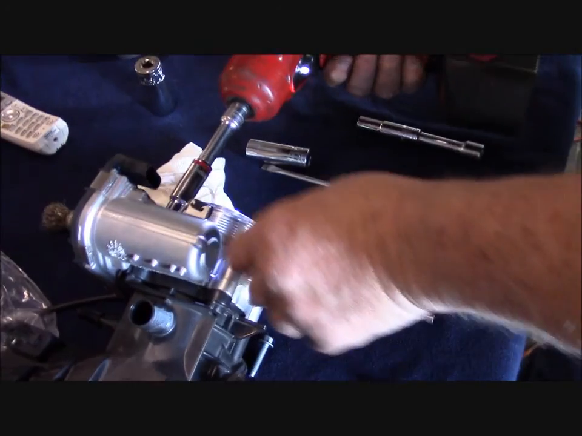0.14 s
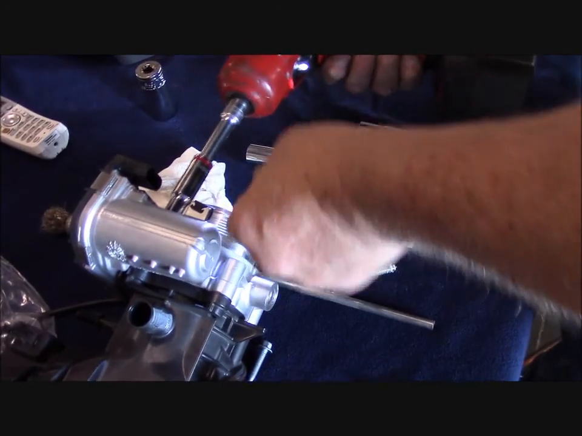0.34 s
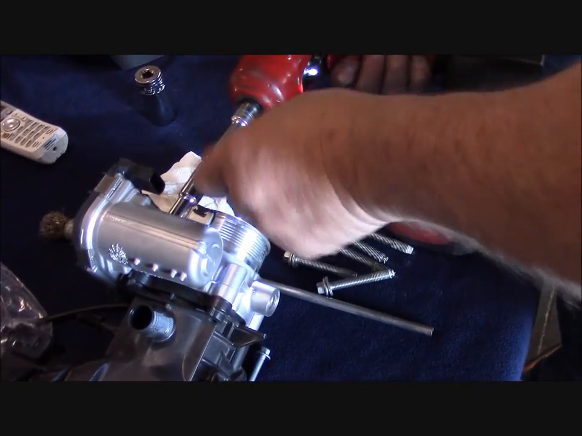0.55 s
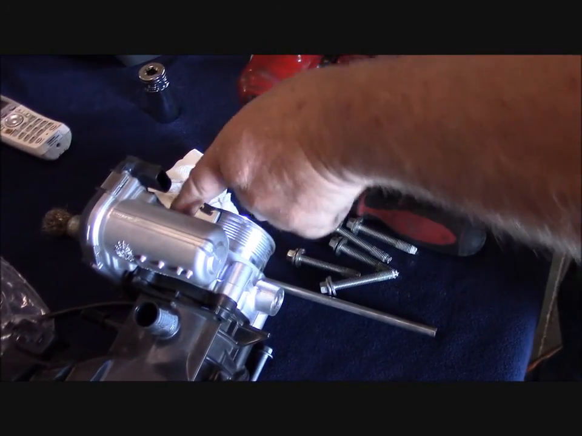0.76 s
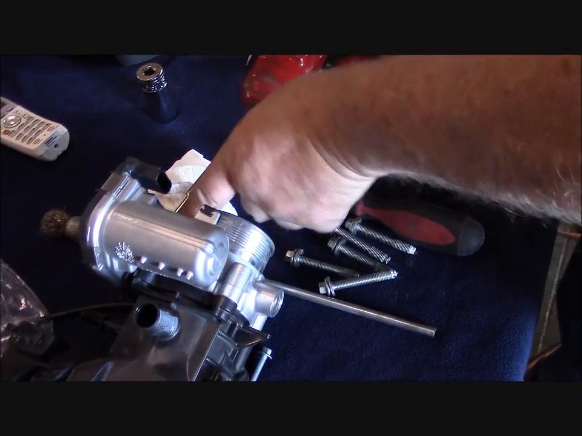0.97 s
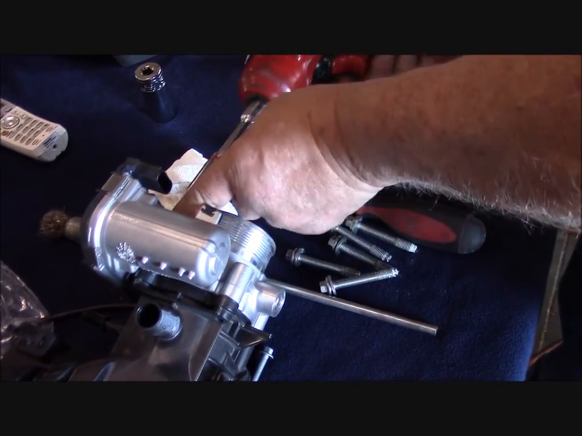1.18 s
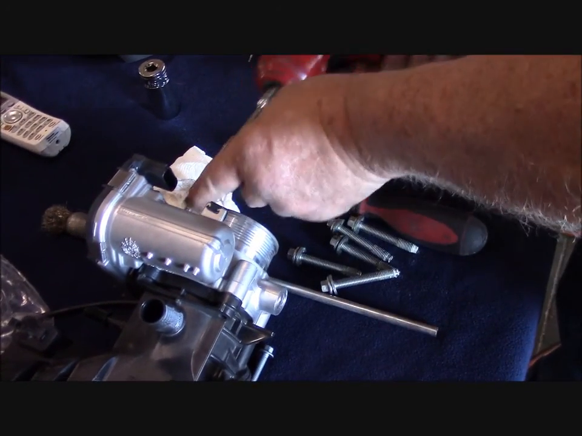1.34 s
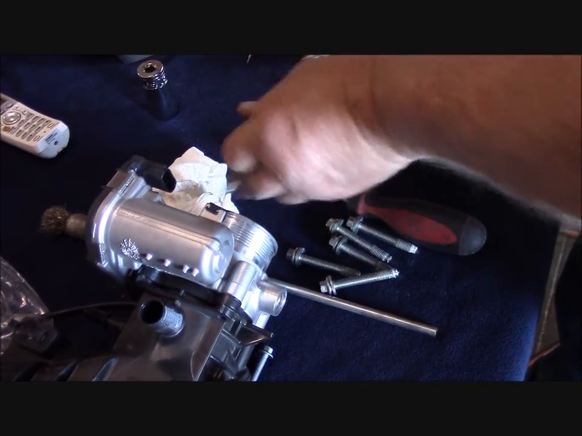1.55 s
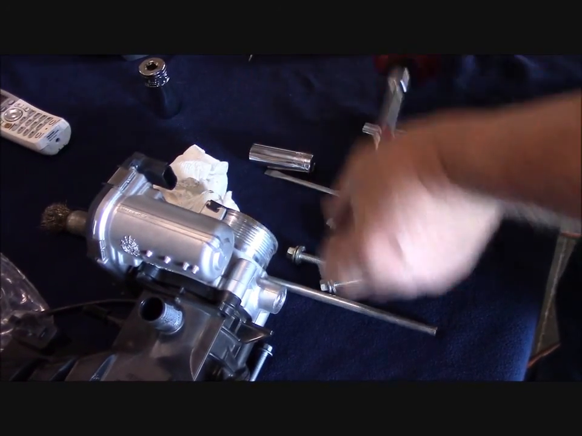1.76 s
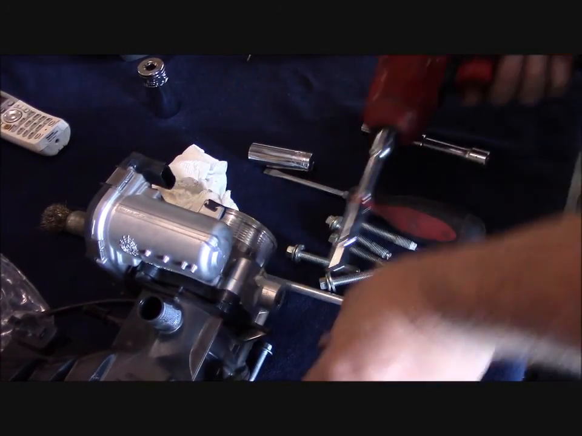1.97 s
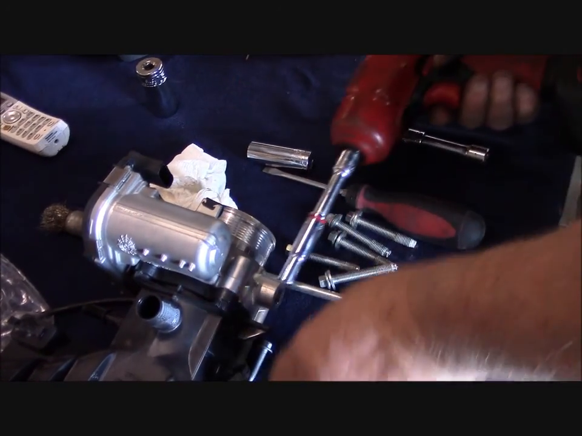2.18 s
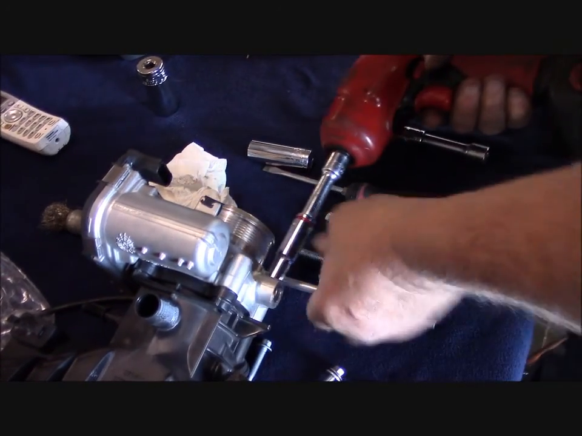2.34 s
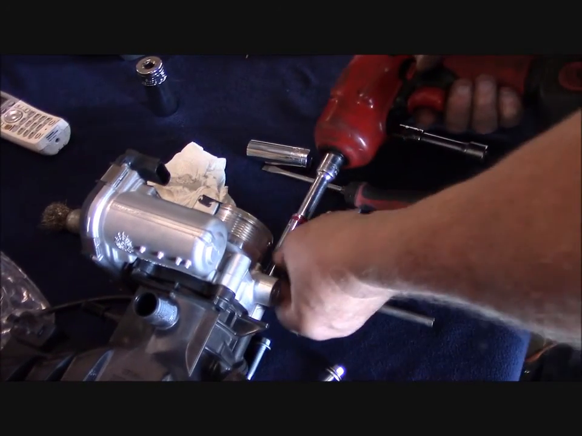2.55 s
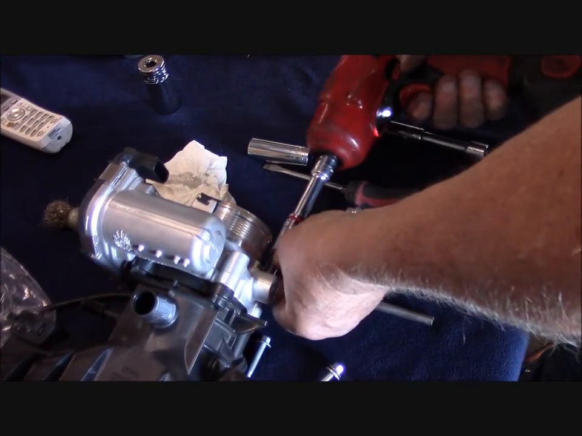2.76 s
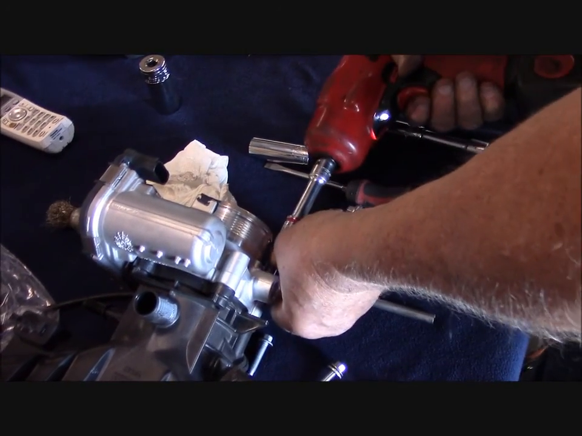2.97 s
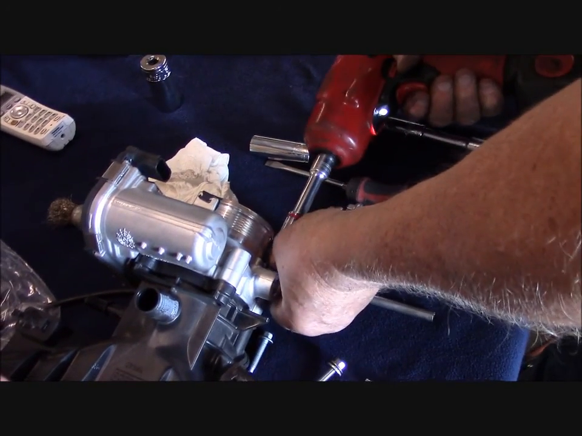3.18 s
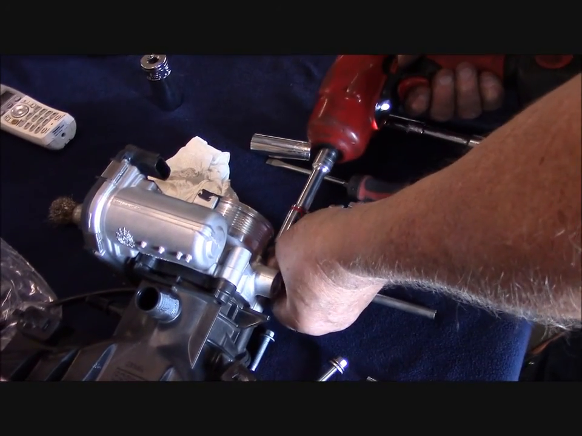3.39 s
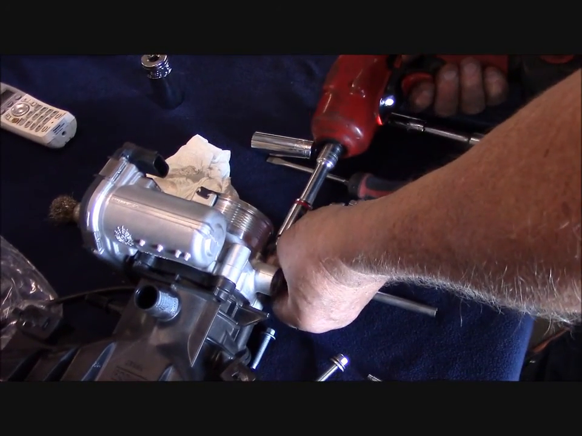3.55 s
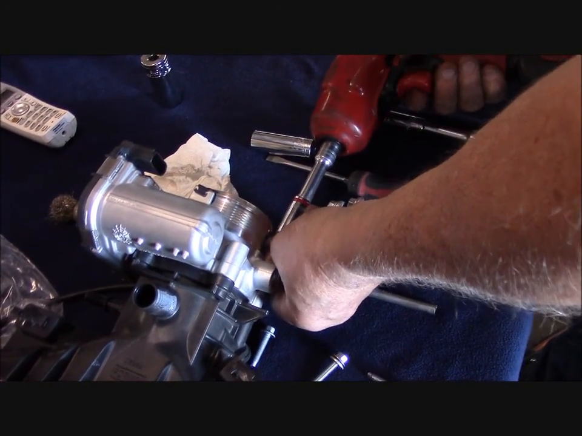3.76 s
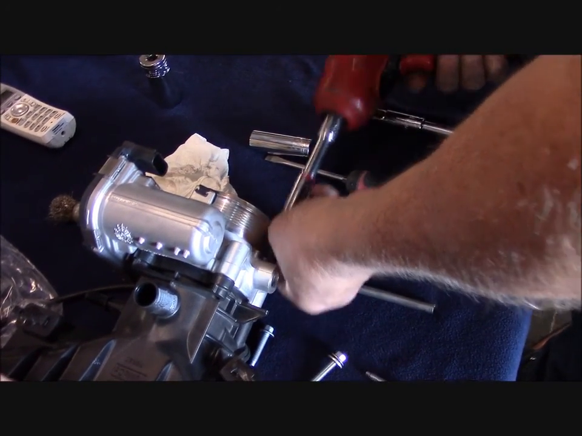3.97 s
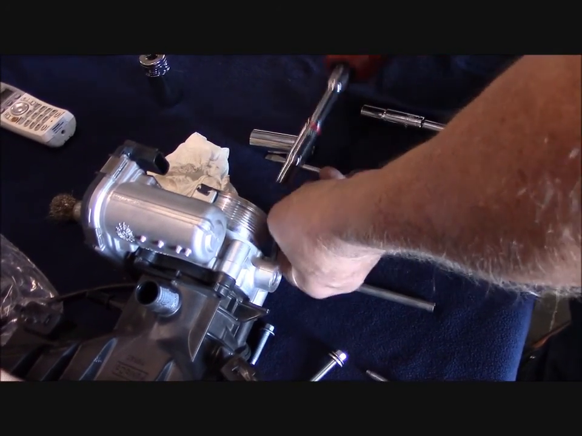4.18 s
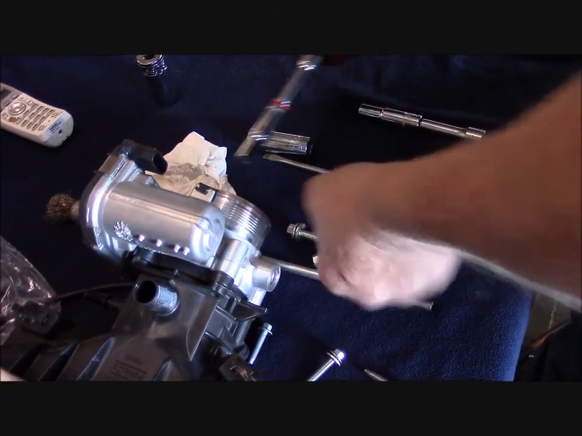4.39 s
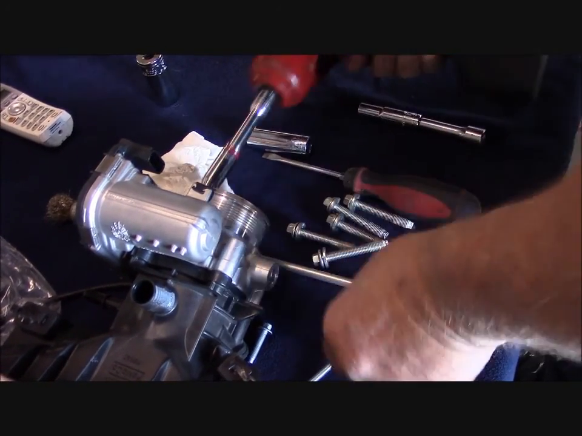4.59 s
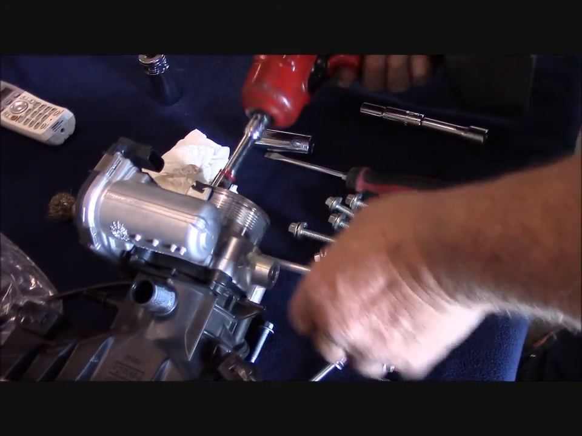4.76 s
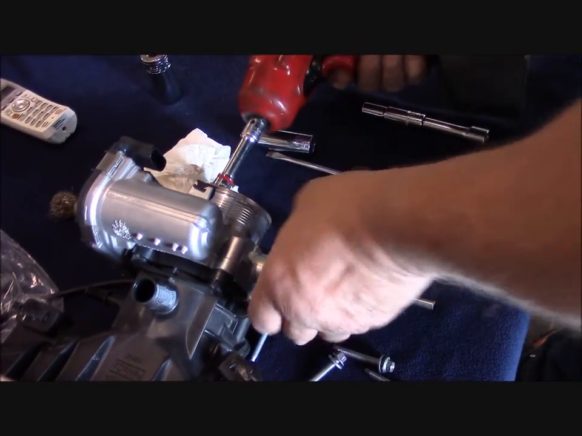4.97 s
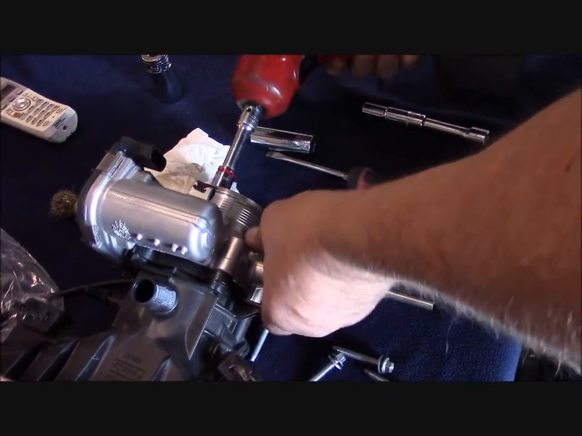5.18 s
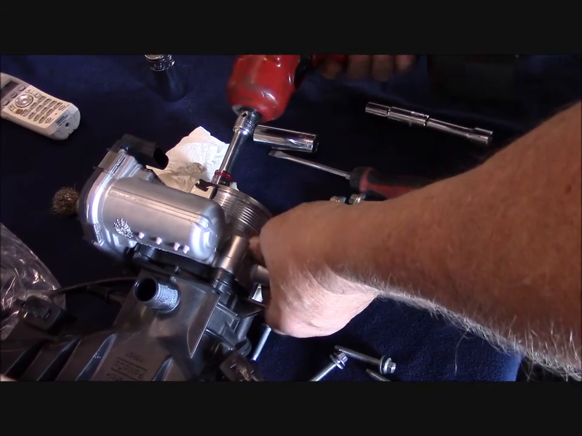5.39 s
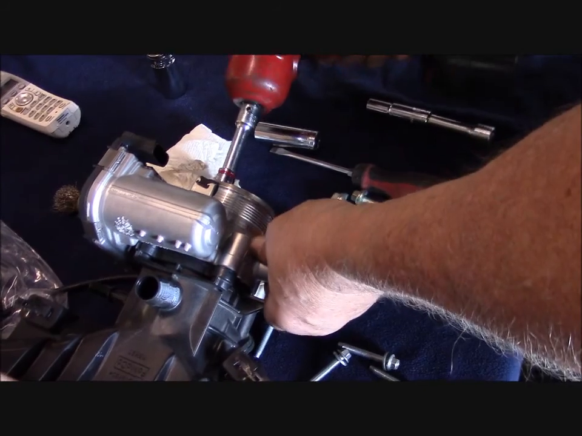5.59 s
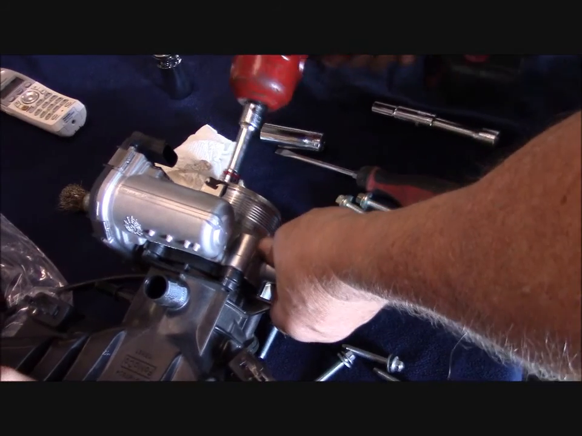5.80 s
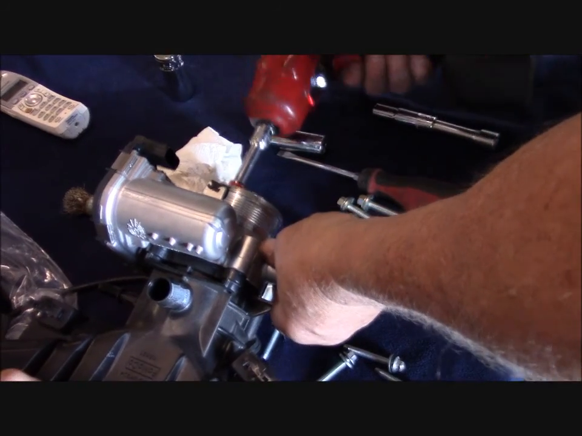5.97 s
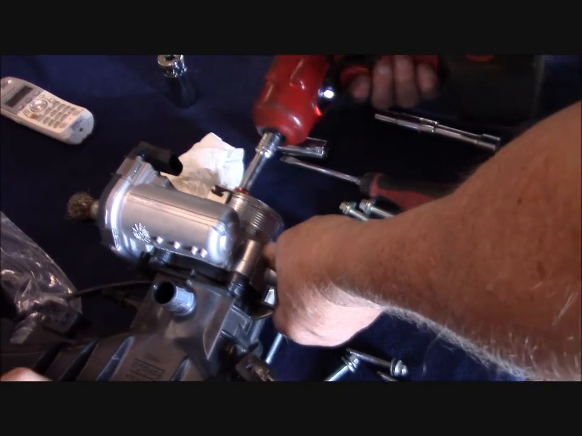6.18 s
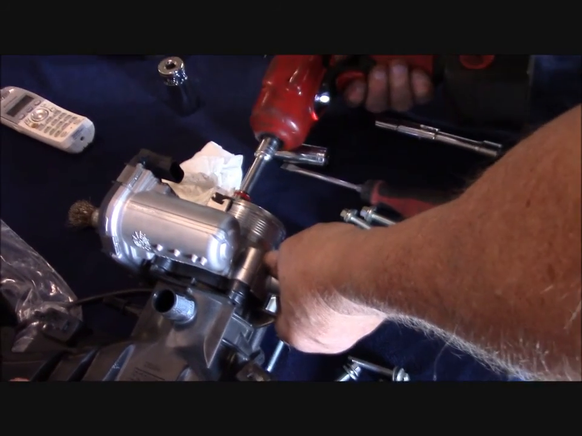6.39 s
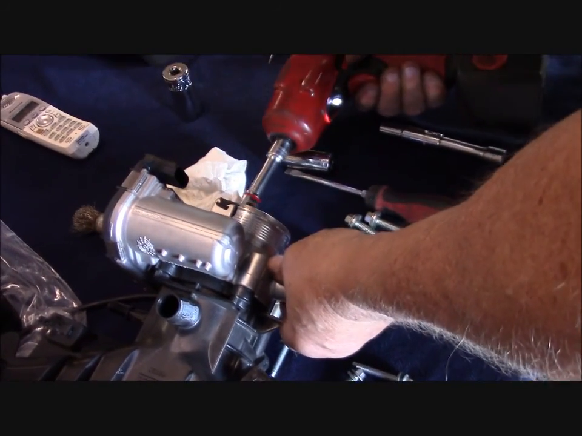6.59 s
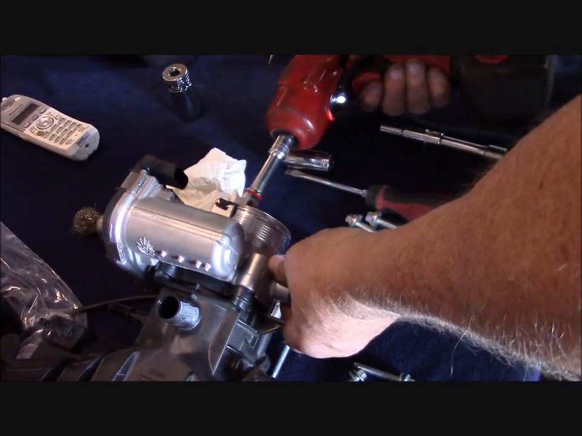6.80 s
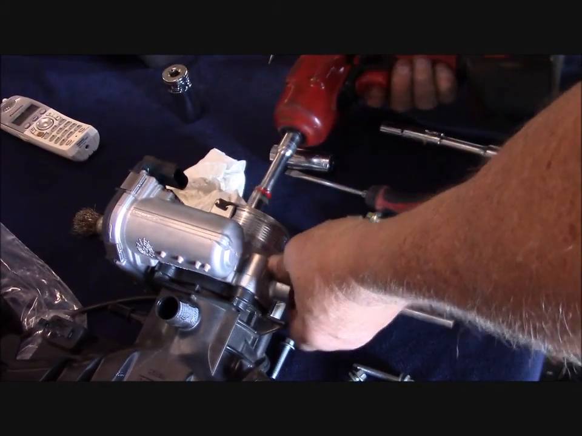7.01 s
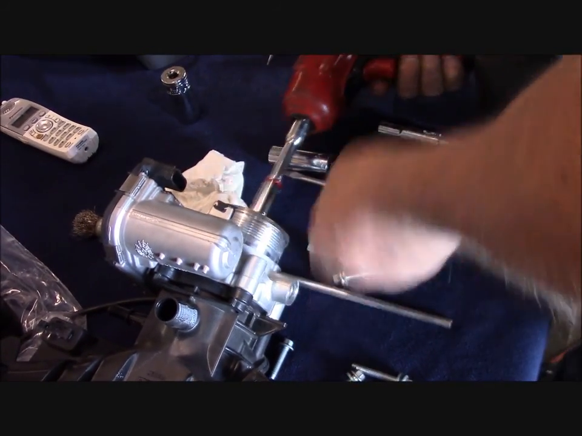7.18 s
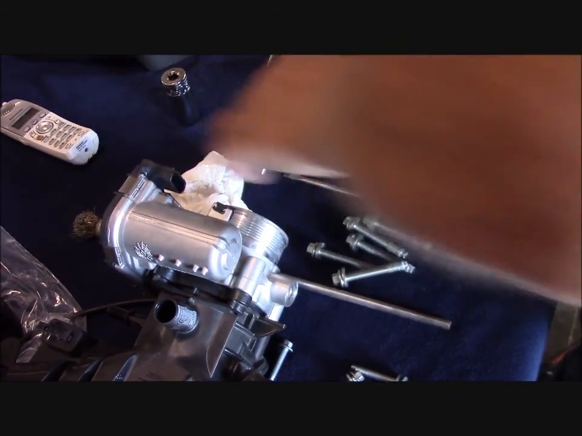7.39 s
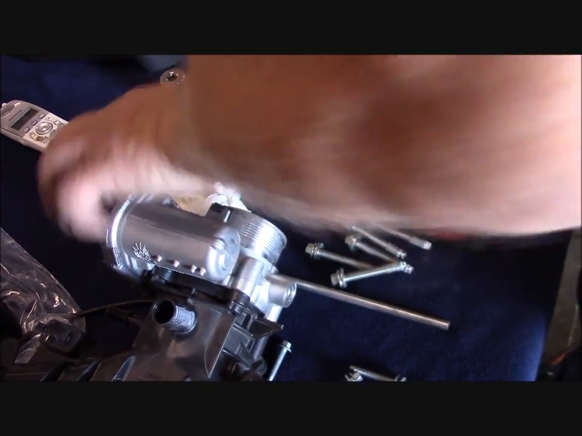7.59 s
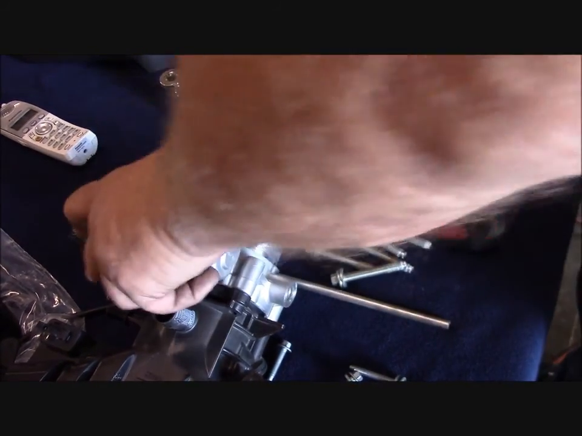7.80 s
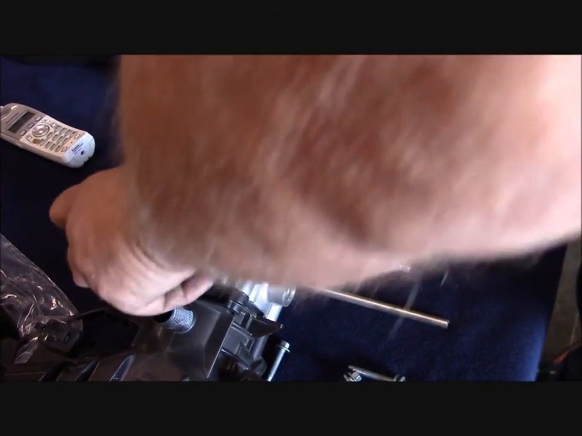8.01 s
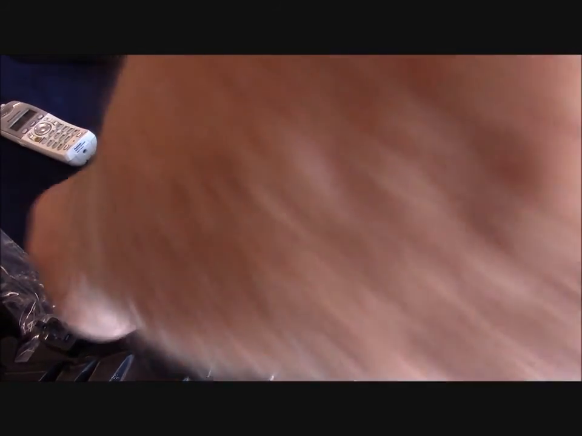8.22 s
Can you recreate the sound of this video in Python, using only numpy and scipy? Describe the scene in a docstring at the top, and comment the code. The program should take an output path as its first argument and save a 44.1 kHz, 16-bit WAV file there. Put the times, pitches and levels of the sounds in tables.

```python
"""A cordless impact driver undoes three bolts in an aluminium casting on a cloth-covered garage bench.
Each time, repeated impacts excite casting and steel; the freed rotor then whines while the socket rattles,
and coasts down. Between runs, bolts drop with dull thuds and decaying sine tones, fingers rub the metal, and
the socket taps about for the next head; at last the driver is set down. A machine nearby hums, a gliding tone
with air noise: it swells until 2.8 s, drops sharply, then glides down and is very faint from 5.6 s."""
import sys
import numpy as np
from scipy import signal
from scipy.fft import rfft, irfft
from scipy.io import wavfile

SR = 44100
rng = np.random.default_rng(int(sys.argv[2]) if len(sys.argv) > 2 else 0)


def unload_wav(signal):
    """Save mono or channel-first audio to the path in sys.argv[1] as 16-bit WAV at rate SR, clipped to [-1, 1]."""
    wavfile.write(
        sys.argv[1],
        SR,
        np.round(np.clip(np.atleast_2d(signal).T, -1, 1) * 32767).astype(np.int16),
    )


N = 363816
T = np.arange(N) / SR  # t/s

# Levels are relative, ahead of each layer's gain and filters, unless stated otherwise.
# hammering on each bolt: [first blow t/s, socket seats t/s, bolt gives t/s, end t/s, first gap/s,
# gap growth per blow/s, casting level/dB, steel level/dB]
BURSTS = [(0.0, 0.0, .06, 0.086, 0.027, 0.00031, -22, -19.5),
          (2.8135, 2.855, 2.975, 3.155, .0269, .00024, -13.7, -12.5),
          (5.973, 6, 6.125, 6.282, .0245, .00056, -13.7, -13.5)]
# socket knocks: hard catches on the bolt head while hammering, and the loudest knocks of the socket wobbling on
# a freed bolt: [t/s, casting level/dB, steel level/dB]
KNOCKS = [(0.0243, -23, -14.5), (.082, -30, -16.5), (0.142, -44, -28), (0.5186, -24, -29),
          (0.6013, -25.5, -32), (0.7453, -24.5, -27), (.796, -24, -33), (1.0409, -31.5, -37),
          (2.8669, -17, -9), (3.0056, -23, -7), (3.178, -26, -48), (3.8144, -27.5, -30.5),
          (3.8536, -29.5, -28), (3.9198, -37.5, -42), (6.021, -28, -7.5), (6.7683, -26, -29),
          (6.8986, -26.5, -20)]
# socket wobbling on a freed bolt: [from t/s, to t/s, casting level/dB, steel level/dB]
WOBBLES = [(.11, 1.08, -31.5, -36.5), (3.64, 3.94, -32.5, -32), (6.63, 7.22, -34, -35)]
# motor, one row a bolt: [trigger pulled t/s, bolt free t/s, trigger released t/s, spin-up time/s,
# coasting rate/(Hz/s), growl level/dB, hiss level/dB, whine level/dB,
# gear tone order (multiple of rotor speed), gear tone level/dB]
RUNS = [(-.1, 0.058, .89, 0.24, 1133, -36, -39.5, -40, 5.4, -53),
        (2.8, 3.138, 3.775, 0.32, 899.7, -42.5, -43.5, -43, 5.4, -43),
        (5.939, 6.29, 6.988, .175, 1000, -38, -41, -37, 4.267, -41.5)]
# motor whine: [order (multiple of rotor speed), level/dB]
MOTOR_ORDERS = [(5, -11), (9, -10), (15, 1.5), (23, -12.5), (30, -8), (45, -15.5)]
# socket feeling for a head, tools touching, and last knocks of the socket as it coasts down: [t/s, casting
# level/dB, socket level/dB]
TAPS = [(1.089, -54, -51), (1.119, -57, -51.5), (1.2212, -44, -62), (2.3832, -29.5, -76),
        (2.4846, -32, -64), (2.506, -30.5, -61), (2.6228, -43, -57), (4.7475, -49.5, -55),
        (4.8343, -36.5, -51.5), (5.0144, -36, -51), (5.0908, -45, -53), (5.1722, -49, -60),
        (5.3368, -29, -64), (5.3967, -36, -73), (5.692, -37, -67), (5.7035, -30.5, -60), (5.9414, -38, -51),
        (7.2524, -47, -58.5), (7.7473, -42, -52), (7.9034, -30.5, -43.5), (7.9201, -35.5, -44.5),
        (7.9663, -33.5, -46.5), (8.031, -34.5, -48)]
# bolts and driver landing on the padded bench, lower when softer and heavier:
# [t/s, level/dB, centre f/Hz, t60/s]
THUDS = [(2.157, -27.5, 830, 0.027), (2.178, -27, 450, .08), (2.263, -39, 378, 0.056),
         (4.642, -27, 540, 0.076), (7.692, -30.5, 440, 0.073), (7.701, -27, 190, 0.26),
         (7.884, -21.5, 343, 0.21), (7.895, -18.5, 195, 0.19), (7.921, -33, 114, 0.17),
         (7.968, -33, 204, 0.41)]
# ringing metal, loose bolts and the socket's high note after some taps: [t/s, f/Hz, level/dB, t60/s]
CLINKS = [(2.163, 7440, -57, 0.44), (2.187, 7440, -47.5, 0.33), (2.669, 6030, -44, 0.11),
          (4.609, 7435, -32.5, 0.35), (4.748, 11100, -50, 0.063), (5.091, 11100, -52, 0.088)]
# fingers turning a bolt and sliding over metal: [t/s, length/s, level/dB]
RUBS = [(1.195, 0.26, -53.5), (7.497, 0.056, -57), (8.109, .14, -58)]
# nearby machine's hum: [t/s, f/Hz, level/dB]
HUM = [(0, 131.5, -50.5), (.8, 132, -50.5), (2, 133, -46), (2.8, 132, -42), (3.2, 131, -59),
       (3.9, 127, -61), (4.4, 124, -63.5), (5, 117, -61), (5.6, 116.3, -76)]
# machine's tones of fixed pitch: [f/Hz, level re hum/dB]
HUM_TONES = [(447, -25.5), (581, -21.5), (716, -22), (1109, -23.5)]
# mains hum: [f/Hz, rms level/dB]
MAINS = [(60, -73.5), (120, -71)]

# resonances of the casting with the socket on it: [f/Hz, width/Hz, level/dB]
CASTING = [(504, 60, -9.5), (646, 96, -4), (784.5, 65, 2.5), (1026, 57, -2.5), (1167, 77, -2),
           (1510, 45, -6.5), (1792, 72, -8), (2100, 20, -11), (2626, 90, -3.5), (3160, 60, -2.5)]
# resonances of anvil, extension and socket: [f/Hz, width/Hz, level/dB]
STEEL = [(3727, 45, -2.5), (4590, 90, -4), (5990, 170, -6.5), (6500, 130, -7.5), (6680, 58, -4),
         (7130, 72, -0.5), (7550, 140, -1.5), (8310, 180, -4), (11020, 88, -5), (13200, 250, -9.5)]
# resonances of the socket alone: [f/Hz, width/Hz, level/dB]
SOCKET = [(4650, 62, -3), (7400, 60, -8), (8280, 71, 2), (8700, 89, -2), (11000, 50, 3)]
# resonances of the driver's housing: [f/Hz, width/Hz, level/dB]
HOUSING = [(1380, 460, -1), (2700, 300, -3.5), (4500, 1000, -1), (9100, 2000, -0.5)]

# spectral envelope of the whole casting shaken by a blow: [f/Hz, level/dB]
BLOW_COLOUR = [(60, -36), (150, -14.5), (330, -4.5), (700, -1), (1200, -6), (2500, -17.5), (5000, -35)]
# spectral envelope of contacts with the casting: [f/Hz, level/dB]
TAP_COLOUR = [(150, -35.5), (450, -10.5), (750, -1.5), (1500, 5), (3000, -3.5), (4800, -14.5), (8000, -42)]
# spectral envelope of contacts in the steel: [f/Hz, level/dB]
STEEL_COLOUR = [(1500, -29.5), (3500, -2.5), (5000, -1.5), (8000, -0.5), (10000, 0), (12000, -4.5),
                (15500, -14.5)]
# spectral envelope of touches on the socket: [f/Hz, level/dB]
SOCKET_COLOUR = [(2000, -18.5), (4200, -8), (6500, -4.5), (8500, -7.5), (11500, -13.5), (15000, -22)]
# spectral envelope of a landing: [multiple of its centre f, level/dB]
LANDING_COLOUR = [(.1, -35), (.3, -15), (.6, -4.5), (1, 1), (1.6, -7.5), (3, -22.5), (7, -40.5), (20, -52),
                  (60, -85)]
# spectral envelope of the gear clatter: [f/Hz, level/dB]
GEAR_COLOUR = [(59, -45.5), (100, -20.5), (140, -11.5), (181, -20.5), (315, -10), (373, -14), (768, -5.5),
               (1280, -3), (1550, -1), (1720, -4), (4110, -5.5), (5530, -6.5), (8280, -9.5), (14700, -18),
               (16000, -34.5)]
# spectral envelope of rubbing: [f/Hz, level/dB]
RUB_COLOUR = [(800, -0.5), (2500, -0.5), (3700, 0.5), (4600, 3.5), (6300, -9), (8400, -3), (9500, -10.5),
              (15000, -20)]
# spectral envelope of the machine's air noise: [f/Hz, level/dB]
AIR_COLOUR = [(94, -30.5), (160, -3.5), (183, -18.5), (254, -17.5), (396, -23), (719, -15.5), (924, -34),
              (1120, -17), (1440, -25.5), (3300, -34), (8310, -57), (16000, -79.5)]
# spectral envelope of the quiet room: [f/Hz, level/dB]
ROOM_COLOUR = [(35, -28.5), (55, -10), (80, -10.5), (130, -2), (420, -3), (600, -6), (1100, -10),
               (2000, -15), (3500, -21.5), (4400, -29), (8000, -34), (16000, -57)]

# blows are weaker until the socket seats, and fade once the bolt gives
UNSEATED_CASTING_DB, UNSEATED_STEEL_DB = -5.5, -11.5
CASTING_FADE_DB_PER_S, STEEL_FADE_DB_PER_S, BLOW_SCATTER_DB = 55, 24, 1
# rebounds come part of the way to the next blow, unevenly, and weaker while the socket is not seated
REBOUND_SHARE, REBOUND_JITTER_S = .53, .002
REBOUND_CASTING_DB, REBOUND_STEEL_DB, REBOUND_FADE_DB_PER_S = -2, -5.5, 80
REBOUND_SCATTER_DB, REBOUND_UNSEATED_DB = 2, -3
CHATTER_DB = -3  # relative to the rebound
# rotor turns per second while hammering and running free; rotor turns per socket turn
LOADED_HZ, FREE_HZ, GEAR_RATIO = 225.7, 311.4, 12
START_S, UNLOAD_S = .025, 0.11  # time constants of starting and of the load easing off
# exponents of amplitude against rotor speed
GROWL_POWER, HISS_POWER, WHINE_POWER, WOBBLE_POWER = 1.36, 1.8, 1.1, 1.22
# gain added under full load; fade of the whine after release
LOAD_GROWL_DB, LOAD_HISS_DB, LOAD_WHINE_DB, WHINE_FADE_DB_PER_S = 9, 0.5, 3, 22
WOBBLE_SCATTER_DB, WOBBLE_JITTER_S = 2.5, .002
TOP_HZ = 15800  # upper band edge


def hammer():
    """Impact excitation: every blow cracks in the steel extension and rings on in the casting's modes."""
    s, casting_db, steel_db = np.transpose(blows())
    clack_force = contacts(s, casting_db, t60=0.03, tail_db=-12.0, tail_t60=0.13, rise=.0008)
    clack = through(clack_force, response(TAP_COLOUR, CASTING, ring_db=4.5))
    # the boom favours hard blows, which shake the whole casting
    boom_db = casting_db + 0.32 * (casting_db + 12.5)
    boom_force = contacts(s, boom_db, t60=.035, tail_db=-15.0, tail_t60=0.19, rise=0.0012)
    boom = through(boom_force, response(BLOW_COLOUR, CASTING, ring_db=7))
    steel_force = contacts(s, steel_db, t60=0.013, tail_db=-23.5, tail_t60=.08, rise=0.00047)
    steel = through(steel_force, response(STEEL_COLOUR, STEEL, ring_db=11))
    body = undb(2) * clack + undb(2) * boom + undb(9.5) * steel
    return through(body, dense_modes(t60=0.09, db=-8.0))


def blows():
    """Repeated impact: lengthening gaps, rebounds and socket chatter; rows of (t/s, casting/dB, steel/dB)."""
    rows, k = [], np.arange(16)
    for first, seats, gives, end, gap, growth, casting_db, steel_db in BURSTS:
        hard, bright, late, lively = rng.standard_normal((len(k), 4)).T
        gaps = gap + growth * k
        s = first + np.cumsum(gaps) - gaps
        unseated = s < seats
        loose_s = np.maximum(s - gives, 0)
        casting = casting_db + UNSEATED_CASTING_DB * unseated
        casting = casting - CASTING_FADE_DB_PER_S * loose_s + BLOW_SCATTER_DB * hard
        steel = steel_db + UNSEATED_STEEL_DB * unseated
        steel = steel - STEEL_FADE_DB_PER_S * loose_s + BLOW_SCATTER_DB * bright
        rebound_db = REBOUND_UNSEATED_DB * unseated - REBOUND_FADE_DB_PER_S * loose_s
        rebound_db = rebound_db + REBOUND_SCATTER_DB * lively
        rebound_casting = casting + REBOUND_CASTING_DB + rebound_db
        rebound_steel = steel + REBOUND_STEEL_DB + rebound_db
        rebound_s = s + REBOUND_SHARE * gaps + REBOUND_JITTER_S * late
        hits = [*zip(s, casting, steel), *zip(rebound_s, rebound_casting, rebound_steel)]
        rows += [hit for hit in hits if hit[0] < end]
        # one chatter per gap, only while the seated bolt is still tight
        chatter_s = s + rng.uniform(.2, .85, len(k)) * gaps
        chatter = zip(chatter_s, rebound_casting + CHATTER_DB, rebound_steel + CHATTER_DB)
        rows += [hit for hit in chatter if seats < hit[0] < gives]
    return rows


def motor():
    """Order-locked radiation: gear noise swells once a socket turn; tones follow multiples of rotor speed."""
    out = 0
    teeth_path = response(GEAR_COLOUR, CASTING + STEEL, ring_db=2.0)
    gearbox = signal.fftconvolve(teeth_path, dense_modes(t60=0.1, db=-5.5))
    low_band = signal.butter(3, 4200, fs=SR, output="sos")
    high_band = signal.butter(3, 4200, "high", fs=SR, output="sos")
    for pulled, free, released, spin_up_s, coast, growl_db, hiss_db, whine_db, mesh_order, mesh_db in RUNS:
        rotor_hz = rotor_speed(pulled, free, released, spin_up_s, coast)
        speed = rotor_hz / FREE_HZ
        load = np.exp(-np.maximum(T - free, 0) / UNLOAD_S)
        turns = np.cumsum(rotor_hz * (1 + .0012 * walk(90))) / SR
        wobble = undb(1.1 * np.sin(2 * np.pi * turns / GEAR_RATIO) + 1.4 * walk(70))
        teeth = through(noise() * undb(3 * walk(450)) * wobble, gearbox)
        growl = unit(signal.sosfilt(low_band, teeth))
        hiss = unit(signal.sosfilt(high_band, teeth))
        # (order, level/dB, phase jitter/rad): the gear tone is the rougher one
        tones = [(k, whine_db + db, .3) for k, db in MOTOR_ORDERS] + [(mesh_order, mesh_db, .45)]
        whine = 0
        for k, db, jitter in tones:
            gain = np.interp(T, T[::100], housing_gain(k * rotor_hz[::100]))
            tone = np.sin(2 * np.pi * k * turns + jitter * walk(140))
            whine = whine + gain * undb(db + 1.8 * walk(25)) * tone
        whine_gain_db = LOAD_WHINE_DB * load - WHINE_FADE_DB_PER_S * np.maximum(T - released, 0)
        out = out + growl * undb(growl_db + LOAD_GROWL_DB * load) * speed ** GROWL_POWER
        out = out + hiss * undb(hiss_db + LOAD_HISS_DB * load) * speed ** HISS_POWER
        out = out + whine * undb(whine_gain_db) * speed ** WHINE_POWER
    return out


def rotor_speed(pulled, free, released, spin_up_s, coast_hz_per_s):
    """Rotational dynamics: held back by the hammer, eased up to free speed, then slowed evenly by friction."""
    started = 1 - np.exp(-np.maximum(T - pulled, 0) / START_S)
    driven_s = np.clip(T, free, released) - free
    driven = FREE_HZ - (FREE_HZ - LOADED_HZ) * np.exp(-driven_s / spin_up_s)
    return started * np.maximum(driven - coast_hz_per_s * np.maximum(T - released, 0), 0)


def housing_gain(hz):
    """Forced resonance: a tone swells as it sweeps through a housing mode; some leaks straight out of vents."""
    vents = undb(-9)
    power = sum(undb(db) ** 2 / (1 + (2 * (hz - f) / w) ** 2) ** 2 for f, w, db in HOUSING)
    return np.sqrt(power + vents ** 2)


def socket_knocks():
    """Impact with play: the socket catches on the head and wobbles on the freed bolt, exciting both bodies."""
    s, casting_db, steel_db = np.transpose(KNOCKS + wobble_knocks())
    casting_force = contacts(s, casting_db, t60=0.034, tail_db=-12, tail_t60=0.12, rise=0.0013)
    casting = through(casting_force, response(TAP_COLOUR, CASTING, ring_db=-1))
    steel_force = contacts(s, steel_db, t60=0.018, tail_db=-16, tail_t60=0.11, rise=0.001)
    steel = through(steel_force, response(STEEL_COLOUR, STEEL, ring_db=17.5))
    return through(undb(2.5) * casting + undb(4.0) * steel, dense_modes(t60=0.031, db=-5.5))


def wobble_knocks():
    """Rotation-locked impact: one knock a socket turn, softer as it slows; rows as in KNOCKS."""
    rows = []
    for run, (start, end, casting_db, steel_db) in zip(RUNS, WOBBLES):
        rotor_hz = rotor_speed(*run[:5]) * (T > start) * (T < end)
        socket_turns = np.cumsum(rotor_hz) / SR / GEAR_RATIO
        turned = np.flatnonzero(np.diff(np.round(socket_turns)))
        for i, (late, hard, bright) in zip(turned, rng.standard_normal((64, 3))):
            db = WOBBLE_POWER * 20 * np.log10(rotor_hz[i + 1] / FREE_HZ) + WOBBLE_SCATTER_DB * hard
            rows.append((T[i] + WOBBLE_JITTER_S * late, casting_db + db, steel_db + db + 2 * bright))
    return rows


def taps():
    """Modal excitation: light single touches let the notes of casting and socket stand out."""
    s, casting_db, socket_db = np.transpose(TAPS)
    casting_force = contacts(s, casting_db, t60=0.039, tail_db=-26.0, tail_t60=0.19)
    casting = through(casting_force, response(TAP_COLOUR, CASTING, ring_db=13))
    socket_force = contacts(s, socket_db, t60=0.019, tail_db=-17.5, tail_t60=0.14)
    socket = through(socket_force, response(SOCKET_COLOUR, SOCKET, ring_db=9.5))
    return undb(2.0) * casting + undb(5.5) * socket


def thuds():
    """Damped impact: the cloth dulls each landing, and the bench top booms a little longer."""
    out = 0
    for s, db, centre_hz, t60 in THUDS:
        colour = [(centre_hz * k, d) for k, d in LANDING_COLOUR]
        force = contacts([s], [db], t60, tail_db=-22, tail_t60=0.55)
        out = out + through(force, response(colour))
    return undb(-0.5) * out


def clinks():
    """Free vibration: a mode of a loose bolt or of the tapped socket decays as a sine, with a tiny tick at its
    onset."""
    rings = 0
    for s, hz, db, t60 in CLINKS:
        rings = rings + undb(db) * fade(T - s, t60) * np.sin(2 * np.pi * hz * (T - s))
    s, _, db, _ = np.transpose(CLINKS)
    tick_force = contacts(s, db, t60=0.0094, tail_db=-16.5, tail_t60=.3)
    return rings + undb(-19) * through(tick_force, response(STEEL_COLOUR))


def rubs():
    """Stick-slip friction: skin and threads on metal give noise of rapidly varying strength."""
    swell = 0
    for s, length, db in RUBS:
        arch = np.sqrt(np.maximum(1 - (2 * (T - s) / length - 1) ** 2, 0))
        swell = swell + undb(db) * arch
    scratch = noise() * undb(4.7 * walk(130) + 2 * walk(25))
    return swell * unit(through(scratch, response(RUB_COLOUR, SOCKET, ring_db=6)))


def garage():
    """Superposed background: a gliding machine hum with air noise, steady mains tones and room noise."""
    hz, db = curves(HUM)
    phase = 2 * np.pi * np.cumsum(hz * (1 + 0.0016 * walk(12))) / SR
    air = through(noise(), response(AIR_COLOUR)) * undb(0.72 * walk(12))
    tones = 0
    for f, d in HUM_TONES:
        tones = tones + undb(d + 3.4 * walk(7.2)) * np.sin(2 * np.pi * f * T + .8 * walk(14))
    hum = np.sqrt(2) * (np.sin(phase) + tones) + undb(-18) * np.sin(2 * phase)
    machine = undb(db) * (hum + undb(-11.5) * air)
    mains = sum(undb(level_db) * np.sqrt(2) * np.sin(2 * np.pi * f * T) for f, level_db in MAINS)
    room = undb(-59 + 0.77 * walk(1.0)) * through(noise(), response(ROOM_COLOUR))
    return machine + mains + room


def walls(x, wet_db, t60):
    """Diffuse reverberation: faint, dull decaying noise tails, different in each channel."""
    t = T[:SR // 2]
    dull = signal.butter(1, 3000, fs=SR)
    tails = signal.lfilter(*dull, rng.standard_normal((2, len(t)))) * fade(t - .008, t60)
    return undb(wet_db) * np.array([through(x, h / np.sqrt(np.sum(h ** 2))) for h in tails])


def contacts(times, dbs, t60, tail_db, tail_t60, rise=0.00027):
    """Contact force: random-sign chatter that builds up and dies fast, with a weaker, longer tail."""
    force, t = np.zeros(N + SR), T[:SR // 2]
    decay = fade(t, t60) + undb(tail_db) * fade(t, tail_t60)
    shape = decay * (1 - np.exp(-t / rise))
    for s, db in zip(times, dbs):
        start = max(int(s * SR), 0)
        force[start:start + len(t)] += undb(db) * shape * rng.choice([-1, 1], len(t))
    return force[:N]


def response(colour, modes=(), ring_db=0., size=8192):
    """Minimum-phase filtering: a unit-energy impulse response, resonances standing out of a broad colour."""
    hz = np.maximum(np.arange(size // 2 + 1) * SR / size, 1)
    points, db = np.transpose(colour)
    gain = undb(np.interp(np.log(hz), np.log(points), db))
    peaks = sum(undb(ring_db + d) ** 2 / (1 + (2 * (hz - f) / w) ** 2) for f, w, d in modes)
    gain = gain * np.sqrt(1 + peaks)
    # folding the cepstrum onto positive time makes the response causal
    cepstrum = irfft(np.log(gain))
    cepstrum[1:size // 2] *= 2
    cepstrum[size // 2 + 1:] = 0
    h = irfft(np.exp(rfft(cepstrum)))
    return h / np.sqrt(np.sum(h ** 2))


def dense_modes(t60, db):
    """High modal density: many weak modes act as decaying noise behind the direct impulse."""
    ring = fade(T[:SR // 4], t60) * rng.standard_normal(SR // 4)
    h = undb(db) * ring / np.sqrt(np.sum(ring ** 2))
    h[0] += 1
    return h / np.sqrt(np.sum(h ** 2))


def through(x, h):
    """Linear system: convolve a sound with an impulse response."""
    return signal.fftconvolve(x, h)[:N]


def fade(t, t60):
    """Exponential damping from t = 0, falling 60 dB in t60."""
    return (t >= 0) * np.exp(-np.log(1000) * np.maximum(t, 0) / t60)


def walk(rate):
    """Random modulation: straight lines between normal draws, rate per second, spread near 1."""
    return 1.2 * np.interp(T * rate, np.arange(4096), rng.standard_normal(4096))


def curves(rows):
    """Linear interpolation of a table's columns in time."""
    s, *columns = np.transpose(rows)
    return [np.interp(T, s, c) for c in columns]


def noise():
    """White noise: independent normal samples."""
    return rng.standard_normal(N)


def unit(x):
    """Normalisation to rms 1."""
    return x / np.sqrt(np.mean(x ** 2))


def undb(db):
    """Logarithmic level to amplitude gain."""
    return 10 ** (np.asarray(db) / 20)


def scene():
    """Superposition: work straight ahead, treble-weighted scatter in antiphase at the sides, and walls."""
    work = hammer() + socket_knocks() + taps() + thuds() + clinks() + motor() + rubs()
    dry = work + garage()
    scatter = through(np.gradient(dry), dense_modes(t60=.035, db=25))
    side_noise = through(noise(), response(ROOM_COLOUR))
    side = undb(-20) * scatter + undb(-80.5) * side_noise
    return dry + np.array([side, -side]) + walls(work, wet_db=-43.5, t60=.35)


def record(dry):
    """Saturation and band limiting: round the hardest blows, drop the deep bass and cut the top."""
    rounded = 1.122 * np.tanh(dry / 1.078)
    lean = signal.sosfilt(signal.butter(3, 52, "high", fs=SR, output="sos"), rounded)
    return signal.sosfilt(signal.ellip(10, .2, 70, TOP_HZ, fs=SR, output="sos"), lean)


dry = scene()
out = record(dry)
unload_wav(out)
```